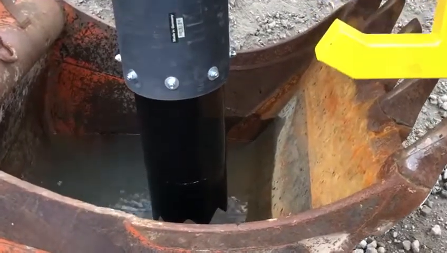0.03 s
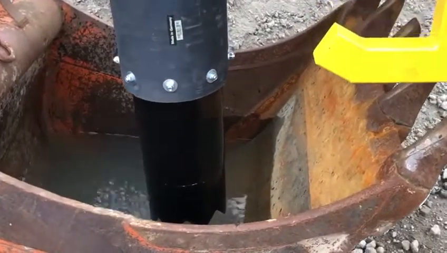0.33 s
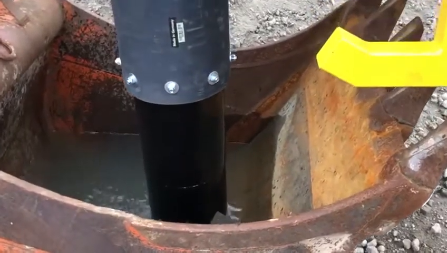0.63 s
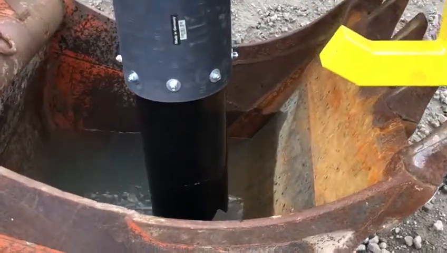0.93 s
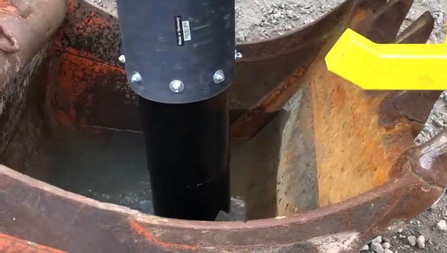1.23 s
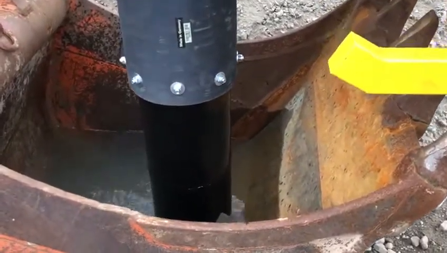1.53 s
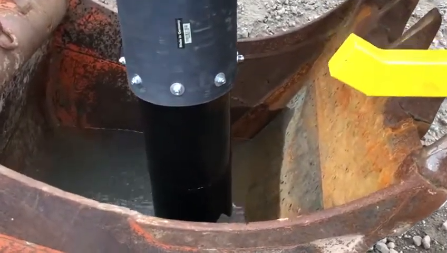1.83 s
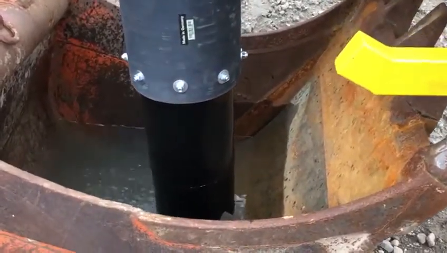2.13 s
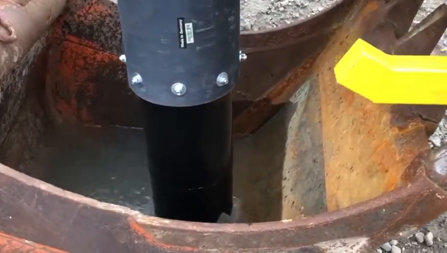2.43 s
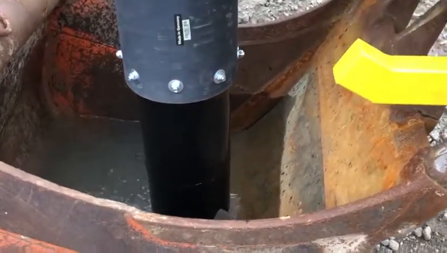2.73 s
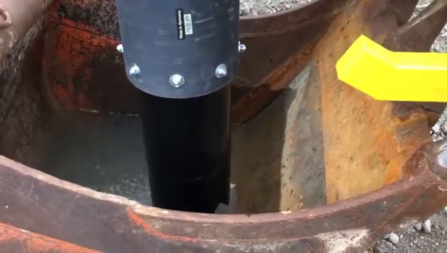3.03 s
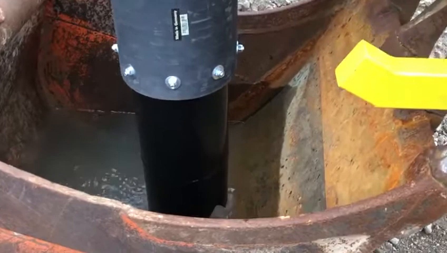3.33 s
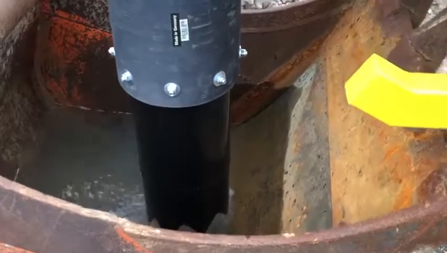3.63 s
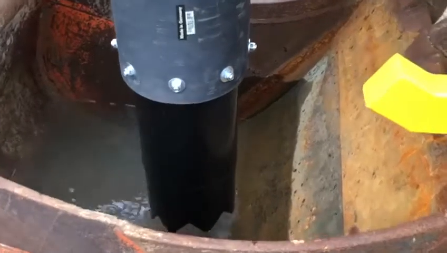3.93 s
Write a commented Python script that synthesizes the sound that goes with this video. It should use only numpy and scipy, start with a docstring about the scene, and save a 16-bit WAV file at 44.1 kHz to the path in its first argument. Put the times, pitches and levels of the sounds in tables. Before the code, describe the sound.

A powerful suction hose roars steadily with a fan whine over an engine drone.

```python
"""Beside the nozzle of a vacuum excavator as it sucks water out of a steel bucket.
The fan's passing blades make a whine, still creeping up in pitch, over the steady drone of the engine.
Turbulent air roars in the hose and hisses at the nozzle, and each gulp of water makes the hose boom
at a low resonance. A mono microphone, moving a little, hears the tones swell and fade
and rounds the highest peaks."""
import sys
import numpy as np
from scipy import signal
from scipy.fft import rfft, irfft
from scipy.io import wavfile
from scipy.ndimage import map_coordinates

SR = 44100
rng = np.random.default_rng(int(sys.argv[2]) if len(sys.argv) > 2 else 0)


def dump(signal):
    """Clip the signal to [-1, 1] and save it as 16-bit WAV at the path in sys.argv[1]."""
    limited = np.clip(np.atleast_2d(signal).T, -1, 1)
    pcm = np.round(limited * 32767).astype(np.int16)
    wavfile.write(sys.argv[1], SR, pcm)


N = 176400

# The fan's run-up. Each row: time in seconds, blade-passing rate in Hz.
BLADE_RATE = [(0.0, 571.0), (0.5, 575.0), (1.0, 579.2), (1.5, 583.5), (2.0, 587.4), (2.5, 590.6),
              (3.0, 593.2), (3.5, 595.6), (4.0, 597.1)]
# The whine at the moving microphone. Each row: time in seconds, levels of harmonics 1 to 7 in dB.
WHINE_LEVELS = [(0, -25, -19, -22, -28, -37, -29, -50), (0.45, -25, -21, -23, -27, -40, -31, -42),
                (0.8, -24, -24, -25, -28, -44, -34, -48), (1.3, -26, -22, -25, -38, -41, -32, -37),
                (1.65, -28, -16, -24, -35, -41, -29, -38), (2.1, -26, -16, -24, -43, -43, -26, -39),
                (2.3, -25, -18, -26, -41, -39, -26, -37), (2.5, -24, -20, -30, -34, -38, -24, -36),
                (2.8, -27, -20, -36, -32, -37, -26, -35), (3.0, -28, -21, -39, -32, -38, -26, -33),
                (3.45, -28, -21, -35, -29, -33, -27, -48), (3.75, -35, -20, -38, -23.5, -25, -23.5, -39),
                (4, -32, -20, -40, -25, -24, -23, -37)]
# Scattering by turbulence. Each entry: scattered share of the amplitude, for harmonics 1 to 7.
WHINE_SCATTER = [.04, .26, .08, .08, .06, .13, .06]
# Tones of the fan's unbalance. Each row: multiple of the shaft rate, base level in dB.
SHAFT_TONES = [(1, -28), (2, -33), (20, -35.5), (22, -39.5)]
# Tones of the engine. Each row: frequency in Hz, base level in dB.
ENGINE_TONES = [(61, -34), (122, -35), (263.8, -26.3)]
# The low drone at the moving microphone. Each row: time in seconds, gain in dB.
DRONE_GAIN = [(0, 0), (1.2, 0), (1.55, -5), (1.9, -8), (2.15, 0), (2.7, .5), (4, -1.5)]
# The rush of air through hose and nozzle. Each row: frequency in Hz, relative spectral density in dB.
AIR_SPECTRUM = [(20, -31), (35, -20), (50, -9.5), (80, -7), (120, -5.5), (220, -6), (440, -7.5),
                (600, -7.5), (760, -8.5), (1000, -7.5), (1400, -8.5), (1750, -9.5), (2000, -14),
                (2300, -15.5), (2600, -21.5), (3500, -20), (5000, -21), (6300, -20.5), (8000, -27),
                (9500, -29.5), (11300, -30), (12000, -41)]
# Low resonant peaks and hollows in the rush of air, the deepest hollow near 370 Hz.
# Each row: centre in Hz, width in Hz, gain in dB.
RUSH_COLOUR = [(52, 14, -2), (71, 12, -4), (93, 14, -6), (115, 22, 2), (162, 38, 2.5), (245, 20, -3),
               (368, 58, -8.5)]
# Registers of the rush. Each entry: top in Hz of rumble, low boom, high boom, body, roar; hiss lies above.
REGISTER_TOPS_HZ = [80, 128, 200, 400, 2500]
# Slow swells of the rush. Each row: time in seconds, gains in dB of those five registers.
REGISTER_GAINS = [(0, 1.0, 0.0, 0.5, 0.0, -0.1), (0.45, 3.6, 1.5, -0.2, -0.5, -0.8),
                  (0.9, 3.1, 1.5, -0.5, -0.5, -0.4), (1.3, -0.1, -2.2, -1.5, -0.3, 0.0),
                  (1.8, -2.2, -3.3, -2.5, -3.0, -0.7), (2.2, -3.7, 0.1, -0.2, 0.5, 0.0),
                  (2.6, -4.3, 0.4, -0.4, -0.3, -0.3), (3.0, -3.3, 0.5, 0.5, 0.7, 0.1),
                  (3.4, -0.5, -0.6, 0.2, 0.2, 0.7), (4, -1.5, -1.7, 2.0, 0.6, 1.2)]
# Booms of the hose. Each row: crest in seconds, pitch in Hz, peak in dB, half-amplitude width in seconds.
GULPS = [(0.11, 156, -16, .05), (0.227, 158, -19, .035), (0.53, 117, -18, .06), (0.561, 157, -17, .03),
         (0.635, 117, -18, .04), (0.713, 160, -17, .045), (0.838, 161, -18, .03), (0.9, 114, -17, .07),
         (1.182, 156, -19, .05), (1.543, 159, -17, .04), (1.706, 158, -19, .03), (2.124, 155, -18, .05),
         (2.416, 169, -15, .03), (2.586, 169, -17, .035), (2.704, 163, -20, .03), (2.795, 161, -16, .03),
         (2.881, 173, -16, .03), (3.018, 163, -17, .045), (3.04, 117, -17, .045), (3.112, 161, -20, .035),
         (3.404, 157, -18, .03), (3.52, 169, -16, .03), (3.692, 168, -17, .03), (3.855, 163, -14, .07),
         (3.942, 158, -14, .03)]

BLADES = 7
TONE_THROB_DB = 1.8  # shaft and engine tones
FLUTTER_DB, FLUTTER_PER_S, SCATTER_PER_S = 1.1, 22, 80  # each harmonic of the whine
AIR_RMS_DB = -13.5
SURGE_DB, SURGE_PER_S = .74, 12  # shared by a whole register
FLICKER_DB, FLICKER_PER_S = 1.33, 20  # each third-octave band alone
BOOM_THROB_DB, THROB_PER_S = 1.7, 16
HISS_SPUTTER_DB, SPUTTER_PER_S = .7, 35
CEILING, CUTOFF_HZ = 1.3, 11900  # microphone; full scale is 1


def undb(db):
    """Amplitude ratio of a level in decibels."""
    return 10 ** (np.asarray(db) / 20)


def unit(x):
    """The signal scaled to an rms of 1."""
    return x / np.sqrt(np.mean(x ** 2) + 1e-18)


def curves(table):
    """Each column of a timed table, interpolated linearly to every sample."""
    times, *columns = np.array(table, float).T
    return [np.interp(np.arange(N) / SR, times, column) for column in columns]


def walk(rate):
    """A smooth random fluctuation of rms 1, with about `rate` new values a second."""
    position = np.arange(0, N, 20) / SR * rate
    smooth = map_coordinates(rng.standard_normal(2048), [position], order=3, mode="mirror")
    return unit(smooth)[np.arange(N) // 20]


def phase(hz):
    """Phase in radians: the time integral of frequency, from a random start."""
    return 2 * np.pi * (np.cumsum(hz) / SR + rng.random())


def throbbing_tone(hz, throbs_per_s):
    """A sinusoid under random amplitude modulation, at an rms of 1."""
    return unit(np.sin(phase(hz)) * undb(TONE_THROB_DB * walk(throbs_per_s)))


def fan_whine(blade_hz):
    """Periodic blade passage radiates harmonics; turbulence modulates their amplitude and phase."""
    blade_phase, out = phase(blade_hz), 0
    for k, db in enumerate(curves(WHINE_LEVELS), 1):
        scatter = 1 + WHINE_SCATTER[k - 1] * (walk(SCATTER_PER_S) + 1j * walk(SCATTER_PER_S))
        harmonic = np.real(scatter * np.exp(1j * (k * blade_phase + 2 * np.pi * rng.random())))
        out += np.sqrt(2) * harmonic * undb(db + FLUTTER_DB * walk(FLUTTER_PER_S))
    return out


def fan_unbalance(blade_hz):
    """Rotating unbalance forces vibration at multiples of the shaft rate; the low ones join the drone."""
    drone_db, = curves(DRONE_GAIN)
    out = 0
    for multiple, db in SHAFT_TONES:
        tone = throbbing_tone(blade_hz * multiple / BLADES, throbs_per_s=5.2)
        out += tone * undb(db + drone_db * (multiple < BLADES))
    return out


def engine_drone():
    """Tones locked to one governed speed wander together in pitch, while each throbs separately."""
    speed = 1 + .003 * walk(rate=3)
    lowest, *upper = [undb(db) * throbbing_tone(hz * speed, throbs_per_s=5.1) for hz, db in ENGINE_TONES]
    rumble_db = curves(REGISTER_GAINS)[0]
    drone_db, = curves(DRONE_GAIN)
    return lowest * undb(rumble_db) + sum(upper) * undb(drone_db)


def air_rush():
    """Turbulence makes broadband noise, coloured by low peaks and hollows and fluctuating band by band."""
    hz = np.arange(N // 2 + 1) * SR / N + 1e-3
    source_hz, source_db = np.array(AIR_SPECTRUM, float).T
    turbulence_db = np.interp(np.log(hz), np.log(source_hz), source_db)
    colour_db = sum(db * 2 ** -(2 * (hz - centre) / width) ** 2 for centre, width, db in RUSH_COLOUR)
    spectrum = rfft(rng.standard_normal(N)) * undb(turbulence_db + colour_db)
    surging_db = [db + SURGE_DB * walk(SURGE_PER_S) for db in curves(REGISTER_GAINS)]
    rumble, low_boom, high_boom, body, roar = surging_db
    throb = BOOM_THROB_DB * walk(THROB_PER_S)
    hiss = HISS_SPUTTER_DB * walk(SPUTTER_PER_S)
    registers_db = [rumble, low_boom + throb, high_boom + throb, body, roar, hiss]
    edges_hz = 16 * 2 ** (np.arange(31) / 3)  # third octaves
    out = 0
    for low, high in zip(edges_hz, edges_hz[1:]):
        register_db = registers_db[np.searchsorted(REGISTER_TOPS_HZ, np.sqrt(low * high))]
        band = irfft(spectrum * ((hz >= low) & (hz < high)), N)
        out += band * undb(register_db + FLICKER_DB * walk(FLICKER_PER_S))
    return undb(AIR_RMS_DB) * unit(out)


def hose_gulps():
    """Each gulp of water and air excites a low resonance of the hose, which swells for a few cycles."""
    t, out = np.arange(N) / SR, 0
    for crest, hz, db, width in GULPS:
        swell = 2 ** -(2 * (t - crest) / width) ** 2
        out += undb(db) * swell * np.sin(phase(np.full(N, hz)))
    return out


def scene():
    """Superposition: the pressures of all sources add, the same in both channels."""
    blade_hz, = curves(BLADE_RATE)
    pressure = fan_whine(blade_hz) + fan_unbalance(blade_hz) + engine_drone() + air_rush() + hose_gulps()
    return np.tile(pressure, (2, 1))


def record(dry):
    """Soft saturation in the microphone rounds the highest peaks; a low-pass filter cuts the top treble."""
    rounded = dry / (1 + (dry / CEILING) ** 4) ** .25
    low_pass = signal.ellip(10, .2, 70, CUTOFF_HZ, fs=SR, output="sos")
    return signal.sosfilt(low_pass, rounded)


dry = scene()
out = record(dry)
dump(out)
```